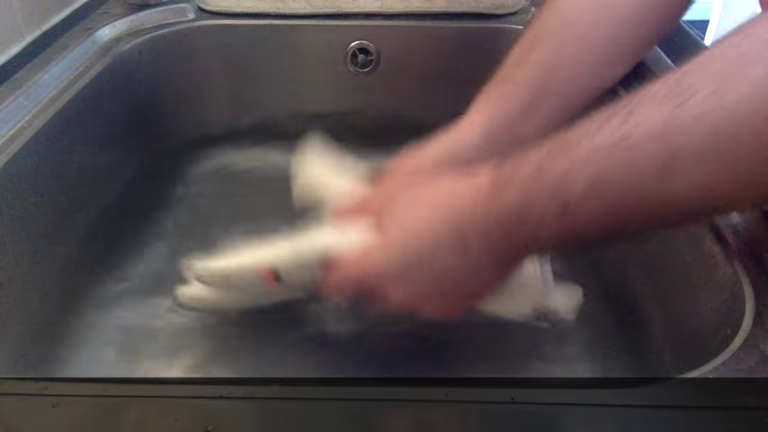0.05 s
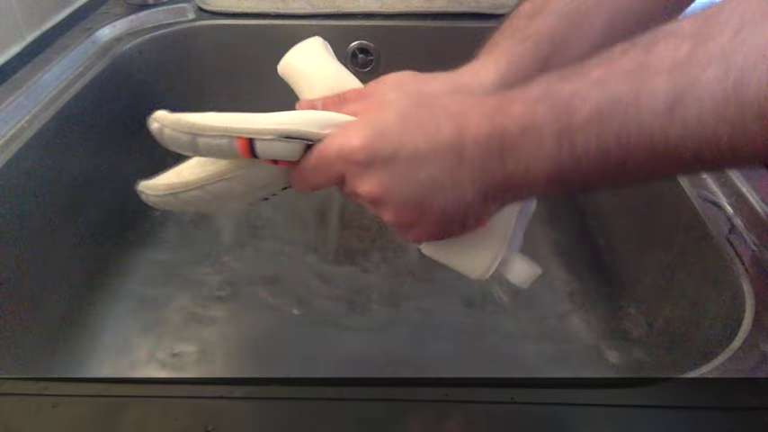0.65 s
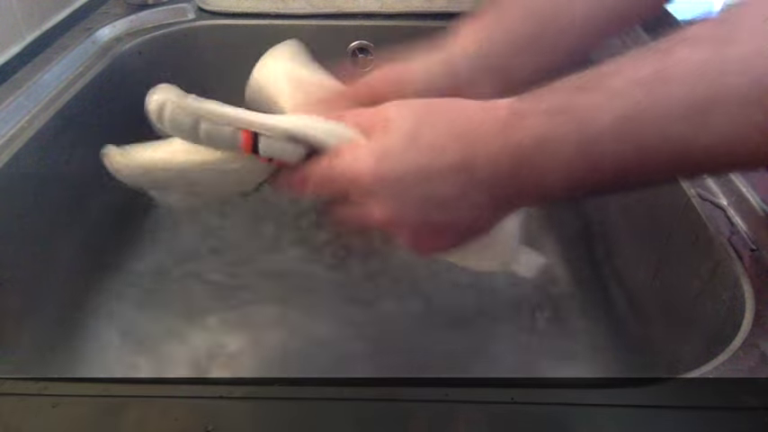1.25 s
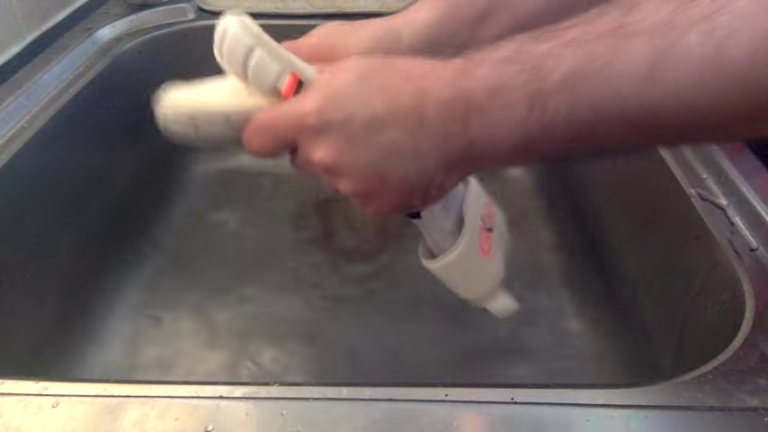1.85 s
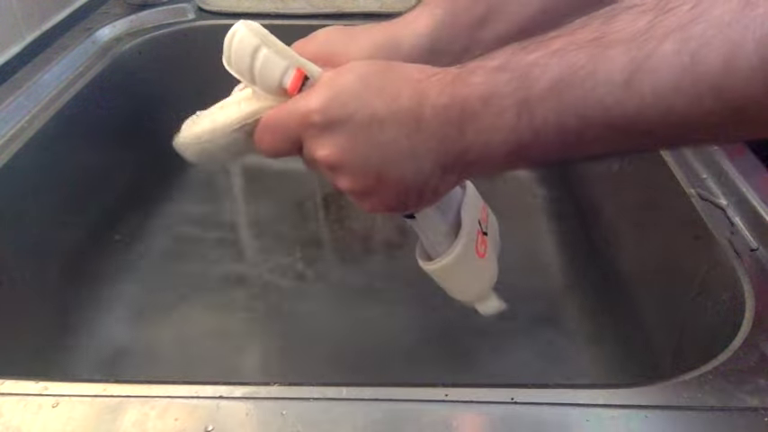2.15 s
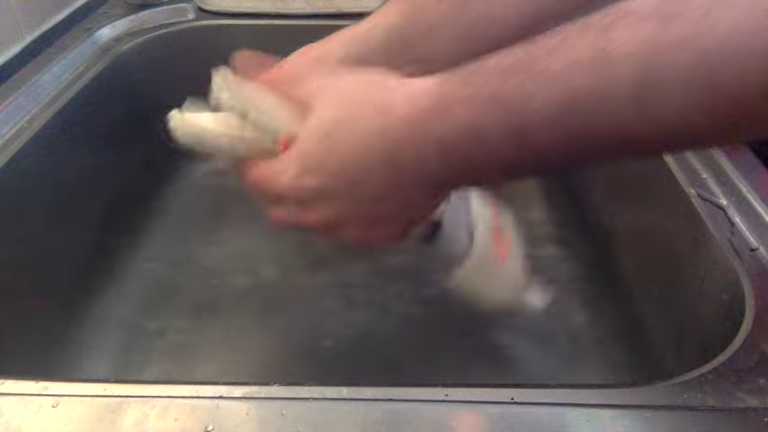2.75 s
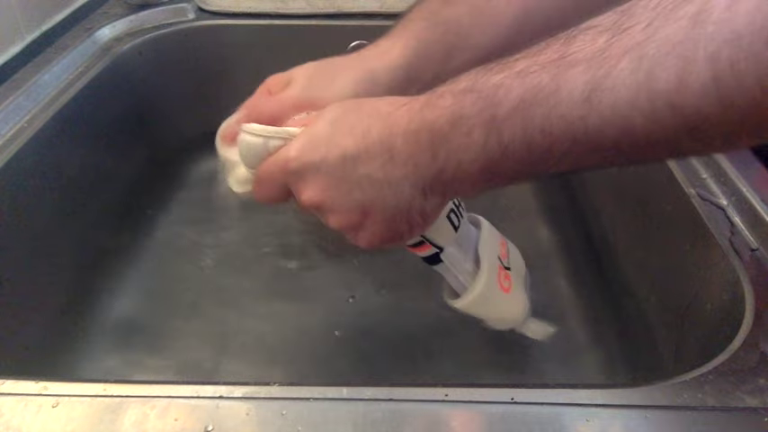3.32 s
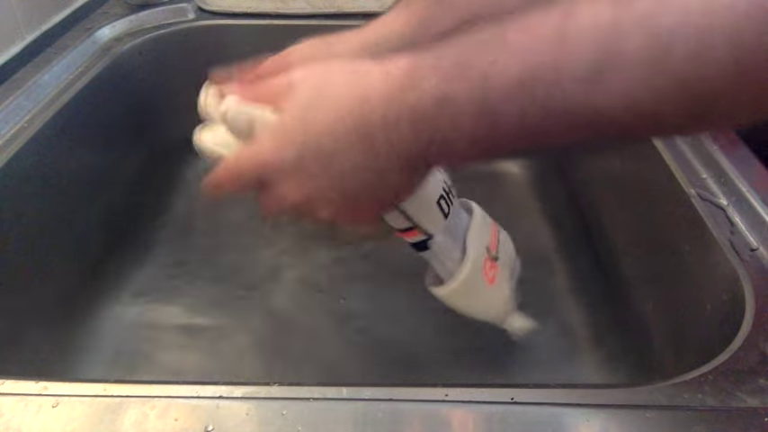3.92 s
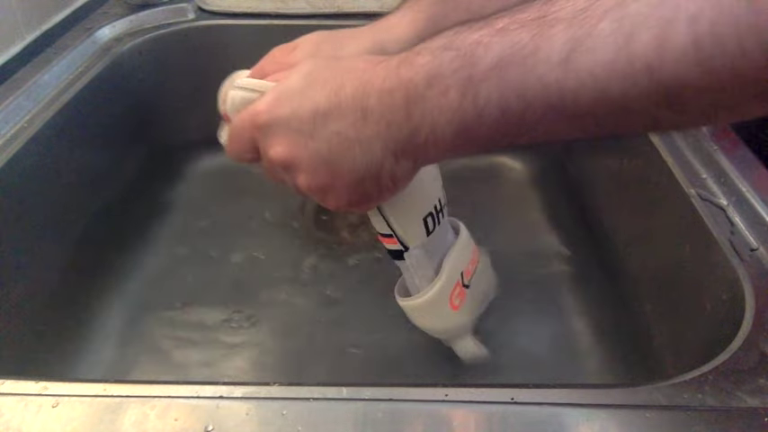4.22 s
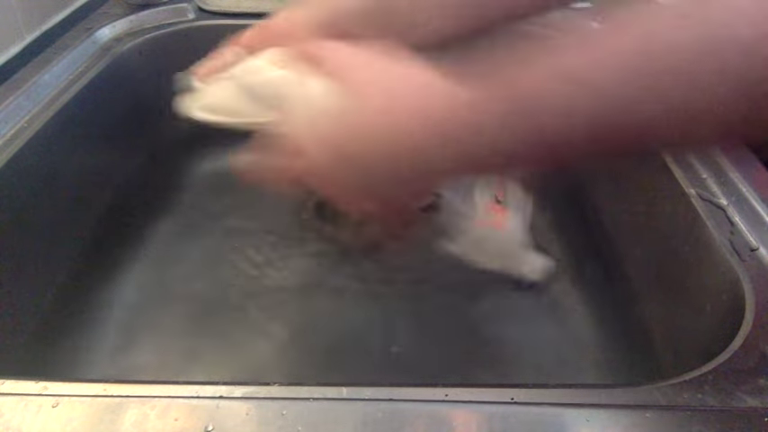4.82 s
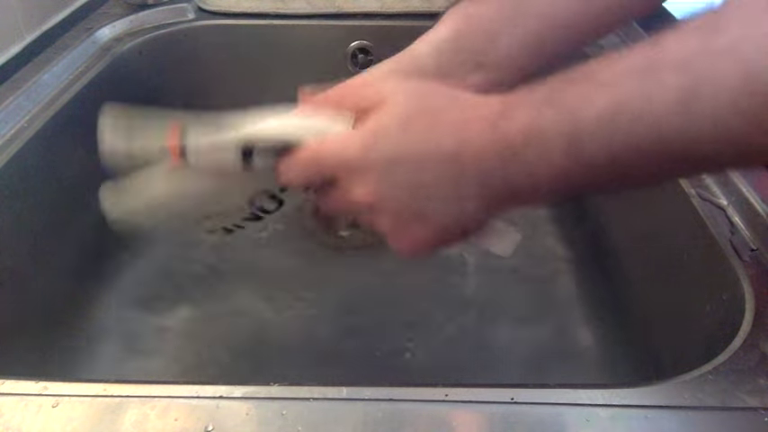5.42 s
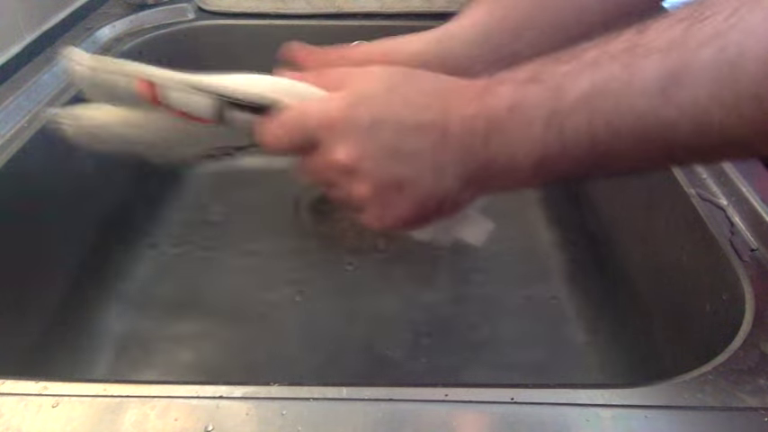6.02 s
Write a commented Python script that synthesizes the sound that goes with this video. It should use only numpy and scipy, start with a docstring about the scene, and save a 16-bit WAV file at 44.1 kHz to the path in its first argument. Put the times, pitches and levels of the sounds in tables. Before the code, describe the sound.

Wet gloves squeezed by hand over a metal sink, with short squelches, bubbly trickles and plinking drops in a quiet kitchen.

```python
"""Water gushes, hisses and drips as soaked gloves are lifted from a part-filled steel sink, wrung
several times and shaken out. The run-off traps ringing bubbles, pressed foam hisses and fizzes,
single drops plink and slap. The basin rings with its hollow tones and a small quiet kitchen
adds a short tail."""
import sys
import numpy as np
from scipy import signal
from scipy.fft import rfft, irfft
from scipy.io import wavfile
from scipy.ndimage import uniform_filter1d

SR = 44100
rng = np.random.default_rng(int(sys.argv[2]) if len(sys.argv) > 2 else 0)


def int16_out(signal):
    """Quantize to a 16-bit WAV file."""
    q = np.round(np.clip(np.atleast_2d(signal).T, -1, 1) * 32767)
    wavfile.write(sys.argv[1], SR, q.astype(np.int16))


N = 267246


def undb(db):
    """Decibels to gain."""
    return np.exp(np.asarray(db) * np.log(10) / 20)


def power(db):
    """Decibels to power."""
    return undb(db) ** 2


def decibels(x):
    """Power to decibels."""
    return 10 * np.log10(x)


def unit(x):
    """Scale to rms 1."""
    return x / np.sqrt(np.mean(x ** 2))


def add(out, start_s, sound):
    """Mix a sound in at start_s."""
    i = max(int(start_s * SR), 0)
    out[i:i + len(sound)] += sound[:max(len(out) - i, 0)]


def colour(x, spectrum):
    """Filter through a spectrum of (Hz, dB) points whose ends fall away."""
    hz, db = np.transpose(spectrum)
    f = np.maximum(np.fft.rfftfreq(2 * N, 1 / SR), 1)
    gain = undb(np.interp(np.log(f), np.log(hz), db))
    ends = np.minimum(f / hz[0], 1) ** 2 * np.minimum(hz[-1] / f, 1) ** 4
    return irfft(rfft(x, 2 * N) * gain * ends)[:N]


def coloured_noise(spectrum):
    """Noise of rms 1 shaped by (Hz, dB) points."""
    return unit(colour(rng.standard_normal(N), spectrum))


def band_noise(hz, octaves, count):
    """Noise of rms 1 in a band around hz."""
    edges_hz = np.clip(hz * 2 ** (np.array([-.5, .5]) * octaves), [50, 60], [SR * .4, SR * .45])
    band = signal.butter(5, edges_hz, "band", fs=SR, output="sos")
    return unit(signal.sosfilt(band, rng.standard_normal(count)))


def bubble(hz, ring_s, glide=0, rise=.25):
    """A trapped bubble swells, rings, glides up if asked and is cut short as it surfaces."""
    t = np.arange(int(2.5 * ring_s * SR) + 2) / SR
    age = t / ring_s
    swell = 1 - np.exp(-t / min(rise * ring_s, .0015))
    return swell * np.exp(-age ** 2.03) * np.sin(2 * np.pi * hz * t * (1 + glide * age / 2))


def room_tone(level_db=-81):
    """Faint steady noise of the still kitchen."""
    # Noise spectrum. Each row: frequency in Hz, relative level in dB.
    spectrum = [(45, -24.5), (90, -2.5), (160, -2), (240, 10), (370, -2.5), (490, 1), (700, -17),
                (1100, -14.5), (3500, -25), (5500, -14), (7200, -52.5), (16000, -25.5)]
    return undb(level_db) * coloured_noise(spectrum)


def kitchen(x, walls_db=-9, walls_decay_s=.0043, room_db=-13, room_t60_s=.24):
    """Quick reflections between the steel walls, then the short tail of the room."""
    t = np.arange(SR // 2) / SR
    near = rng.standard_normal(len(t)) * np.exp(-t / walls_decay_s) * (t > .002)
    far = rng.standard_normal(len(t)) * undb(-60 * t / room_t60_s) * (t > .008)
    response = undb(walls_db) * near / np.linalg.norm(near) + undb(room_db) * far / np.linalg.norm(far)
    return x + signal.fftconvolve(x, response)[:N]


def basin(x):
    """Splashes set the hollow of the sink ringing."""
    # Hollow tones. Each row: frequency in Hz, width in Hz, gain over the direct sound in dB.
    modes = [(610, 6.1, -12.5), (959, 160, 8.5)]
    return x + sum(undb(db) * signal.lfilter(*signal.iirpeak(hz, hz / width_hz, fs=SR), x)
                   for hz, width_hz, db in modes)


def drumming(stream_db, relative_db=-32):
    """The sink's thin bottom drums under the stream."""
    # Rumble spectrum. Each row: frequency in Hz, relative level in dB.
    spectrum = [(62, -25), (85, -9.5), (130, -2), (220, -6.5), (320, -2.5)]
    return undb(stream_db + relative_db) * coloured_noise(spectrum)


def drips(dribble, per_s=24, low_hz=2200, high_hz=5600, over_db=11, spread_db=6, cycles=17):
    """Stray drips fall at random, scaled by the dribble that feeds them."""
    out = np.zeros(N)
    for when, pitch, size in rng.random((int(per_s * N / SR), 3)):
        hz = low_hz * (high_hz / low_hz) ** pitch
        gain = np.sqrt(dribble[int(when * N)]) * undb(over_db + spread_db * size)
        add(out, when * N / SR, gain * bubble(hz, cycles / hz))
    return out


def slaps(decay_s=.0006, spray_s=.011, spray_db=-16, octaves=.71, ring_s=.0027, ring_db=-8):
    """A drop slaps or a film pops: a sharp wet crack, three tiny bubbles, a little spray."""
    # Slaps and pops. Each row: start in seconds, level in dB, band centre in Hz.
    hits = [(0.228, -48.5, 15000), (0.317, -32.5, 1520), (0.449, -27.5, 3610), (0.624, -37.5, 10900),
            (0.706, -44, 11700), (0.944, -53, 3140), (1.037, -45.5, 12400), (1.108, -47.5, 11900),
            (1.161, -35.5, 11490), (1.205, -43, 3770), (1.257, -38, 3960), (1.326, -39.5, 4470),
            (1.403, -39.5, 3170), (1.402, -34.5, 12540), (1.533, -42, 2190), (1.851, -36.5, 6610),
            (2.052, -33, 4470), (2.0918, -25, 4140), (2.092, -25.5, 9030), (2.228, -39.5, 2450),
            (2.274, -38, 3820), (2.302, -30, 4770), (2.336, -34, 3150), (2.401, -49, 3020),
            (2.535, -34, 4000), (3.278, -38, 3410), (3.325, -32.5, 4210), (3.583, -38, 4810),
            (3.584, -48, 13000), (3.621, -37.5, 6470), (3.623, -46, 13300), (4.007, -47, 14200),
            (4.008, -47, 3450), (4.022, -38.5, 13800), (4.428, -50.5, 8270), (4.629, -35, 2530),
            (4.701, -51, 2700), (4.950, -34, 4240), (5.263, -50, 2630), (5.857, -47, 7900)]
    out, t = np.zeros(N), np.arange(SR // 10) / SR
    envelope = np.exp(-t / decay_s) + undb(spray_db) * np.exp(-t / spray_s)
    for start_s, db, hz in hits:
        crack = band_noise(hz, octaves, len(t)) * envelope
        for late, pitch in rng.random((3, 2)):
            bubble_hz = hz * 2 ** (octaves * (pitch - .5))
            add(crack, late * ring_s, undb(ring_db) * bubble(bubble_hz, ring_s))
        add(out, start_s, undb(db) * crack / np.abs(crack).max())
    return out


def plinks(plop_hz=927.5, churn_db=-19, churn_s=.028, ripple_hz=110, ripple_db=3):
    """Single larger bubbles left by drops or pressed from the foam; water churns briefly around each."""
    # Clear bubbles. Each row: start in seconds, pitch in Hz, level in dB, ring length in ms.
    singles = [ (0.086, 4190, -38.5, 3.2), (0.125, 1720, -43.5, 3.5), (0.14, 1720, -30.5, 4.8),
               (0.157, 1730, -31.5, 6.1), (0.173, 3080, -25.5, 0.96), (0.259, 390, -43.5, 6),
               (.278, 547, -46, 16), (.315, 2055, -22.5, 7.2), (0.45, 2660, -26, 2.1),
               (0.461, 3514, -29, 8.7), (0.519, 592, -50, 54), (0.651, 4000, -37, 10),
               (0.828, 5530, -37, 5.2), (0.973, 3710, -39.5, 3.5), (1.036, 5010, -45.5, 9.3),
               (1.047, 1630, -38.5, 16), (1.126, 1840, -43, 19), (1.225, 896, -42.5, 44.5),
               (1.283, 1470, -34, 2.4), (1.325, 1693, -41.5, 9.6), (1.353, 2180, -47, 8.6),
               (1.375, 3060, -43.5, 5.4), (1.426, 1804, -38, 3), (1.5343, 1647, -38.5, 14),
               (1.543, 3830, -43, 3.6), (2.042, 1810, -35, 4.1), (2.072, 2680, -29.5, 2.2),
               (2.158, 1520, -41, 8), (2.228, 1655, -37.5, 12.6), (2.315, 1770, -32, 2.9),
               (2.395, 595, -54, 30), (2.433, 2411, -33, 3.3), (2.440, 589, -49.5, 94),
               (2.489, 1710, -40, 6), (2.543, 2500, -33.5, 7), (2.66, 2480, -50, 9.2),
               (2.71, 1740, -57.5, 10), (2.975, 3500, -62, 8.4), (3.117, 3800, -51.5, 5.9),
               (3.276, 2700, -44, 8.5), (3.325, 3600, -28, 2.3), (3.326, 5240, -28, 1.9),
               (3.369, 3720, -34, 2.8), (3.424, 2735, -37.5, 5.1), (3.470, 1667, -31, 8.3),
               (3.501, 1270, -48.5, 26), (3.579, 1630, -44.5, 8.2), (3.585, 2650, -38, 8.7),
               (3.621, 4060, -29.5, 1.8), (3.653, 1000, -41, 4.9), (3.706, 2360, -34.5, 3.9),
               (3.742, 1340, -35, 7.5), (3.787, 4920, -46.5, 5), (4.16, 3150, -30, 20),
               (4.187, 3144, -21.5, 4.7), (4.208, 3170, -31.5, 6.1), (4.430, 2810, -40.5, 7.3),
               (4.514, 5720, -41, 3.9), (4.590, 2390, -31.5, 0.97), (4.627, 4540, -29.5, 4.8),
               (4.765, 5400, -48, 5.1), (4.950, 3770, -27.5, 2.3), (4.968, 1637, -39, 10.2),
               (4.984, 2050, -41, 4.1), (5.102, 5920, -53.5, 3.4), (5.263, 1760, -31, 10.8),
               (5.2975, 5170, -31.5, 3.2), (5.31, 3480, -47, 8.1), (5.331, 1970, -38, 3.7),
               (5.369, 4070, -34.5, 1.05), (5.395, 1630, -41, 4), (5.581, 2260, -49, 6.9),
               (5.640, 1715, -44.5, 5.5), (5.718, 1390, -57, 10), (5.819, 4070, -47, 10),
               (5.82, 5850, -37.5, 2.9), (5.837, 1840, -31.5, 8.3), (5.878, 4040, -35.5, 4.3),
               (5.908, 3340, -40, 8), (5.925, 1620, -44, 6.4), (5.979, 2670, -37, 4.9)]
    # Heavy drops at the basin's main tone. Each row: start in seconds, level in dB, ring length in ms.
    heavy_drops = [(0.115, -45.5, 31.5), (0.669, -38, 27), (0.882, -46, 18), (0.943, -40, 43.4),
                   (1.148, -48.5, 35), (1.197, -34.5, 29), (2.092, -48.5, 36), (2.525, -41, 31),
                   (4.381, -50, 28), (4.476, -48.5, 21), (4.52, -45, 65)]
    plops = [(s, plop_hz * (1 + .01 * rng.standard_normal()), db, ms) for s, db, ms in heavy_drops]
    out, t = np.zeros(N), np.arange(SR // 4) / SR
    for start_s, hz, db, ring_ms in singles + plops:
        ring = bubble(hz, ring_ms / 1000, glide=.012)
        # Surface ripples shake the longer rings.
        ripple = unit(signal.lfilter(*signal.butter(2, ripple_hz, fs=SR), rng.standard_normal(len(t))))
        shake_db = ripple_db * np.minimum(t / .015, 1) * ripple
        add(out, start_s, undb(db + shake_db[:len(ring)]) * ring)
        churn = np.exp(-t / churn_s) * band_noise(hz, octaves=.35, count=len(t))
        add(out, start_s, undb(db + churn_db) * churn)
    return out


def surge(start_s, length_s, db, rise_db_s, change_db=0, release_db_s=373):
    """Power of one flow: it rises, holds with a steady change of level and is released."""
    age_s = np.arange(N) / SR - start_s
    rise_db = rise_db_s * np.minimum(age_s, 0)
    hold_db = change_db * np.clip(age_s / length_s, 0, 1)
    release_db = release_db_s * np.maximum(age_s - length_s, 0)
    return power(np.maximum(db + rise_db + hold_db - release_db, -200))


def flows(rows, rise_db_s, dribble_db=-16.5, fade_db_s=54.5):
    """Power over time of a table of flows: in the foam, in the pool, and of the lingering dribble."""
    t = np.arange(N) / SR
    foam, pool, dribble = np.zeros((3, N))
    for start_s, length_s, db, change_db, pool_db in rows:
        flow = surge(start_s, length_s, db, rise_db_s, change_db)
        foam += flow
        pool += flow * power(pool_db)
        since_end_s = np.maximum(t - start_s - length_s, 0)
        dribble += (t > start_s) * power(db + change_db + dribble_db - fade_db_s * since_end_s)
    return foam, pool, dribble


def gobs(per_s=38, decay_s=.011):
    """A falling stream breaks into gobs: sudden surges that die away; mean 0, deviation 1."""
    landings = rng.random(N) * (rng.random(N) < per_s / SR)
    surges = np.tanh(signal.lfilter([1], [1, -np.exp(-1 / (decay_s * SR))], landings))
    return (surges - surges.mean()) / surges.std()


def swarm(spectrum, flow_db, pressed, per_s, cycles, spread_db, onset_db, share):
    """One size range of bubbles: weak flow hisses, above onset_db it bubbles, less so when pressed."""
    ringing = np.zeros(N)
    hiss = coloured_noise(spectrum)
    low_hz, high_hz = spectrum[0][0], spectrum[-1][0]
    for when, pitch, size, length in rng.random((int(per_s * N / SR), 4)):
        hz = low_hz + (high_hz - low_hz) * pitch
        gain = undb(-spread_db * np.log(1 - .97 * size))
        ring_s = cycles * 2 ** (2 * length - 1) / hz
        add(ringing, when * N / SR, gain * bubble(hz, ring_s, glide=.0057, rise=.02))
    ringing = unit(colour(ringing, spectrum)) + .15 * hiss
    # Bubbles alive together share the flow.
    ringing /= np.sqrt(uniform_filter1d(uniform_filter1d(ringing ** 2, size=1400), size=600))
    bubbly = np.clip(share * (1 - .85 * pressed) / (1 + power(onset_db - flow_db)), 0, 1)
    return undb(flow_db) * (np.sqrt(bubbly) * ringing + np.sqrt(1 - bubbly) * hiss)


def running_water(seep_db=-87.5, pressed_share=.5):
    """Gushes, squeezes and faint seepage drive four sizes of bubble, the drumming and stray drips."""
    # Run-off from the gloves. Each row: start and length in seconds, level in dB,
    # change over the length in dB, relative level of the trickle in the pool in dB.
    gushes = [(0.118, 0.12, -52, -15, 4.5), (0.218, 0.16, -48, -3.5, -6), (0.37, 0.11, -49.5, -3.5, -7),
              (0.455, 0.053, -46, -1, -7), (0.52, 0.076, -51.5, 6, -2), (0.635, 0.12, -48, 5, -3.5),
              (0.78, 0.08, -46, -1, -3.5), (0.947, 0.013, -49, -9.5, 3), (1.042, 0.026, -58.5, 9, 6.5),
              (1.123, 0.021, -52.5, -3.5, 7.5), (1.2, 0.041, -52, 5, -2.5), (1.32, 0.13, -79.5, 13.5, 0),
              (1.546, 0.013, -56.5, -21, 11), (2.16, 0.039, -51.5, -5, -4.5), (2.275, 0.19, -52, 5.5, -2.5),
              (2.53, 0.02, -48, -11, -8), (3.285, 0.2, -67.5, 4, -25), (3.478, 0.095, -63.5, 0.5, 3.5),
              (3.62, .13, -50.5, -8, -5), (3.865, 0.029, -61.5, -15, -13.5), (4.38, 0.064, -54.5, -21, -22),
              (4.475, .13, -69.5, -4, 8.5), (4.625, 0.069, -45, -7.5, -2.5),
              (4.958, 0.012, -64, 2.5, -11.5), (5.308, 0.043, -64.5, -9, -12), (5.372, 0.064, -76, 5, 1),
              (5.457, 0.036, -66, -5.5, 9), (5.495, 0.014, -58.5, -3.5, 11.5), (5.55, 0.024, -69, 4, -5.5),
              (5.822, 0.035, -60, 0, -19), (5.86, 0.072, -50, -13, -12)]
    # Water pressed through the fabric. Rows as for the gushes.
    squeezes = [(1.797, 0.067, -50.5, 1.5, -4.5), (1.92, 0.16, -48.5, -3.5, -19),
                (2.065, 0.027, -46, 3.5, -14.5), (2.8, .09, -74.5, -13.5, -1), (3.14, 0.13, -63, 0.5, -8),
                (4.028, 0.039, -55, -12, -6.5), (4.095, .11, -42, -3, -11.5), (4.21, 0.088, -47, -14, -24)]
    # Air pockets gulping, froth bursting. Each row: start and length in seconds, level in dB.
    gulps = [(0.196, 0.14, -60.5), (0.539, 0.1, -67.5), (1.225, 0.092, -70), (1.766, 0.026, -68.5),
             (2.117, 0.21, -70.5), (2.369, 0.11, -62.5), (3.145, 0.033, -74), (3.682, 0.0067, -56),
             (4.011, 0.15, -66.5), (4.642, 0.012, -54.5), (4.693, 0.0091, -65)]
    bursts = [(0.297, 0.063, -66), (0.47, .012, -55), (0.494, 0.0053, -62), (0.635, 0.014, -56),
              (0.705, 0.0067, -46), (2.041, .012, -58.5), (2.081, 0.016, -42), (2.33, 0.018, -57.5),
              (3.18, .38, -84), (4.005, 0.013, -62.5), (4.093, 0.019, -61.5), (4.633, 0.021, -60.5),
              (5.359, 0.01, -77), (5.974, 0.0027, -61)]
    # Bubble spectra, large to small. Each row: frequency in Hz, relative level in dB.
    gurgle = [(220, -21.5), (350, -17.5), (560, -5), (800, -9), (1050, -14.5), (1350, -10)]
    trickle = [(1020, -18), (1280, -0.5), (1700, 4.5), (2300, 9), (3000, -13)]
    squelch = [(1700, -43), (2500, 0), (3500, 2.5), (4600, 2.5), (5600, 1.5), (6400, -10), (7300, -54)]
    fizz = [(5500, -6), (7000, -8), (8500, -9.5), (10500, -14.5), (13000, -10), (16000, -19)]

    gush, gush_pool, gush_dribble = flows(gushes, rise_db_s=1890)
    squeeze, squeeze_pool, squeeze_dribble = flows(squeezes, rise_db_s=751.5)
    gulp = sum(surge(*row, rise_db_s=806) for row in gulps)
    froth = sum(surge(*row, rise_db_s=2389.5) for row in bursts)
    dribble, seep = gush_dribble + squeeze_dribble, power(seep_db)
    flow = gush + squeeze + dribble + seep
    pool = gush_pool + squeeze_pool + dribble * power(-5) + seep * power(-5)
    foam = froth + gush * power(-24) + squeeze * power(-30) + dribble * power(-13) + seep * power(-7)

    pressed = pressed_share * squeeze / flow
    spatter = gobs() * (1 - pressed)
    uneven_grip_db = 1.8 * pressed * coloured_noise([(25, 0), (140, -8)])
    gurgle_db = decibels(gulp + flow * power(-34) + seep * power(-1))
    trickle_db = decibels(pool) + 2 * spatter
    squelch_db = decibels(flow) + 2 * spatter + uneven_grip_db
    fizz_db = decibels(foam) + 3 * spatter

    out = swarm(gurgle, gurgle_db, pressed, per_s=170, cycles=6, spread_db=4, onset_db=-73, share=.85)
    out += swarm(trickle, trickle_db, pressed,
                 per_s=380, cycles=8, spread_db=5.5, onset_db=-68, share=.97)
    out += swarm(squelch, squelch_db, pressed,
                 per_s=850, cycles=10, spread_db=5.5, onset_db=-71, share=.93)
    out += swarm(fizz, fizz_db, pressed, per_s=520, cycles=26, spread_db=7, onset_db=-80, share=.98)
    return out + drumming(trickle_db) + drips(dribble)


def scene():
    """Water in the basin, heard in the still kitchen; mono."""
    water = basin(running_water() + slaps()) + plinks()
    air = room_tone()
    return (kitchen(water) + air)[None]


def record(dry, top_hz=15950):
    """The highest treble is cut off steeply."""
    return signal.sosfilt(signal.ellip(10, .1, 70, top_hz, fs=SR, output="sos"), dry)


dry = scene()
out = record(dry)
int16_out(out)
```